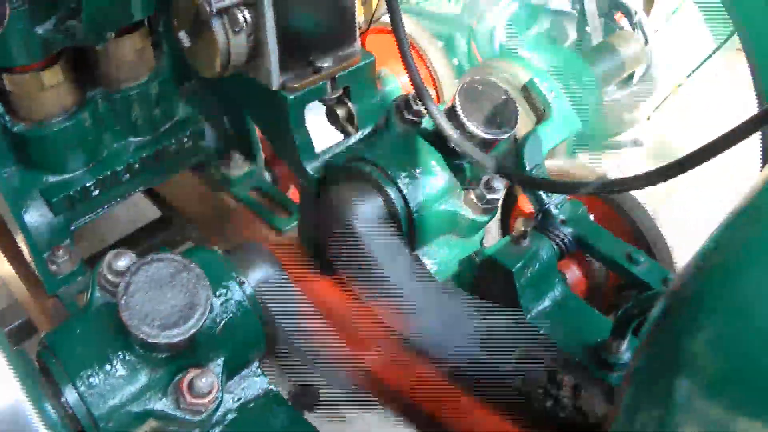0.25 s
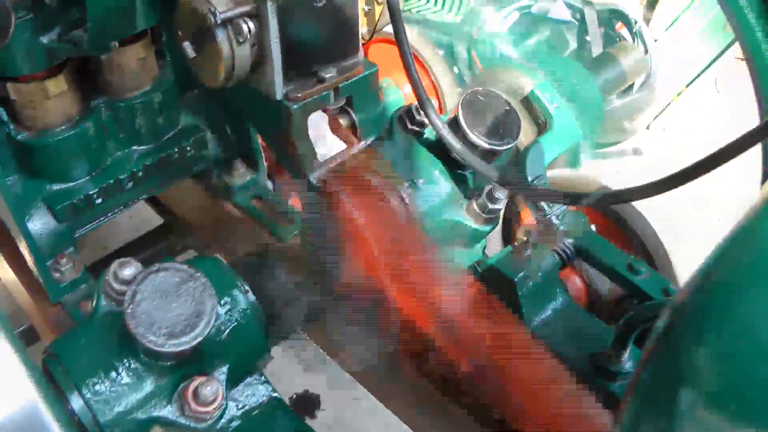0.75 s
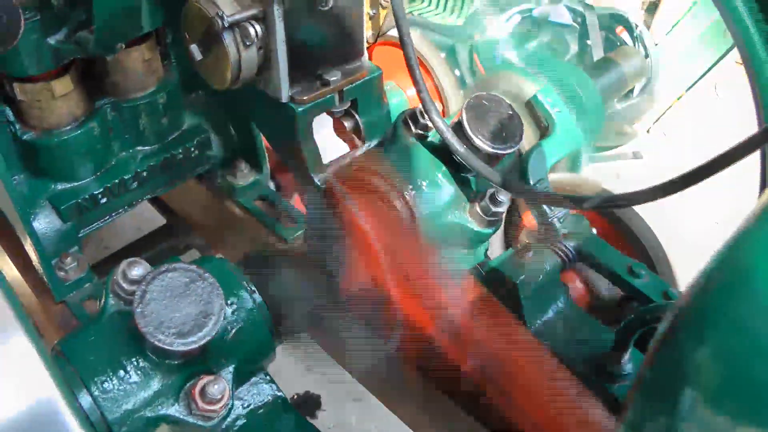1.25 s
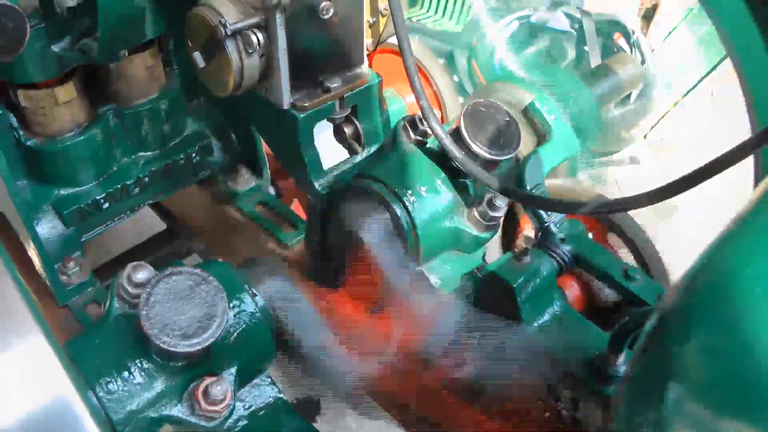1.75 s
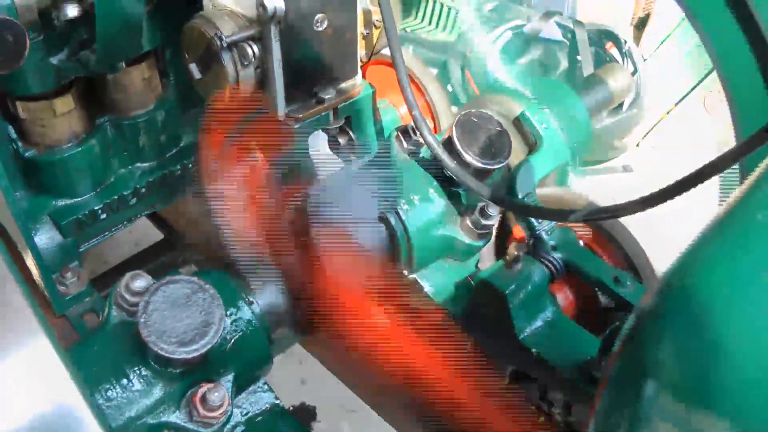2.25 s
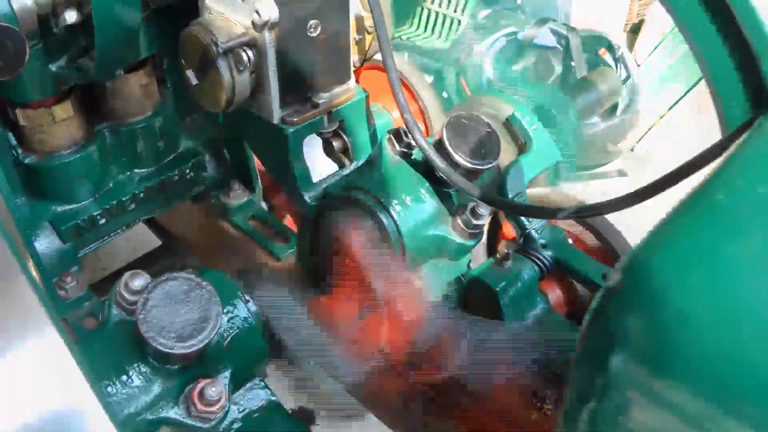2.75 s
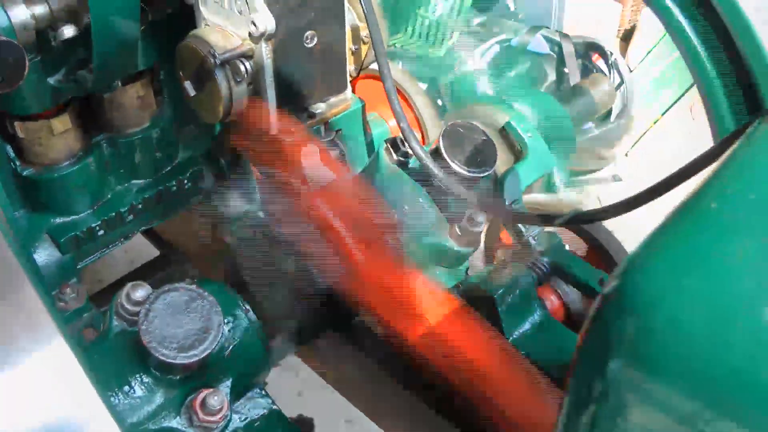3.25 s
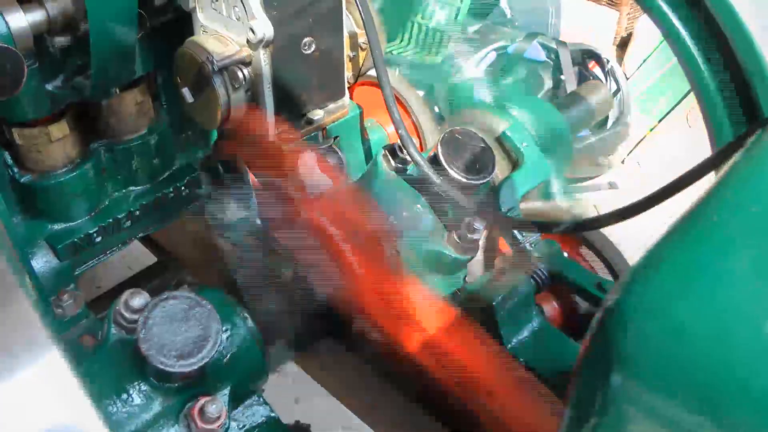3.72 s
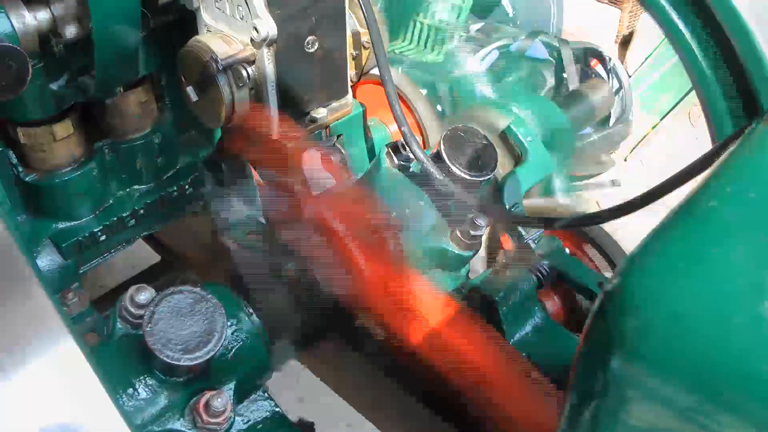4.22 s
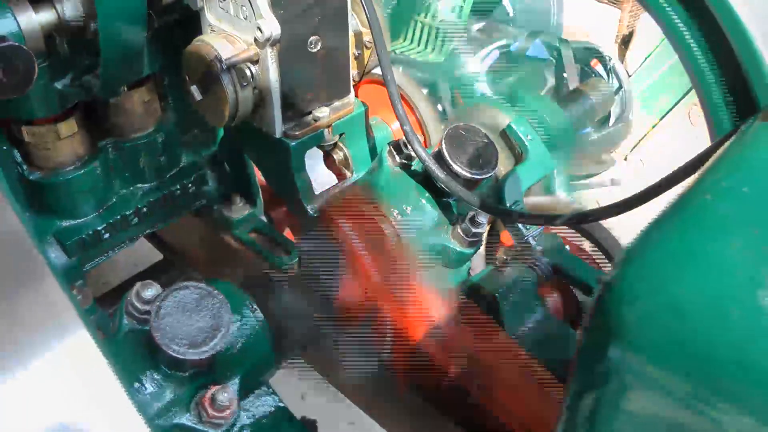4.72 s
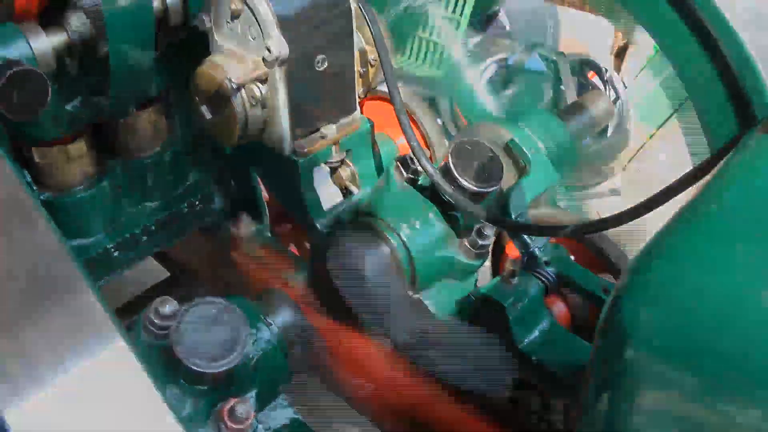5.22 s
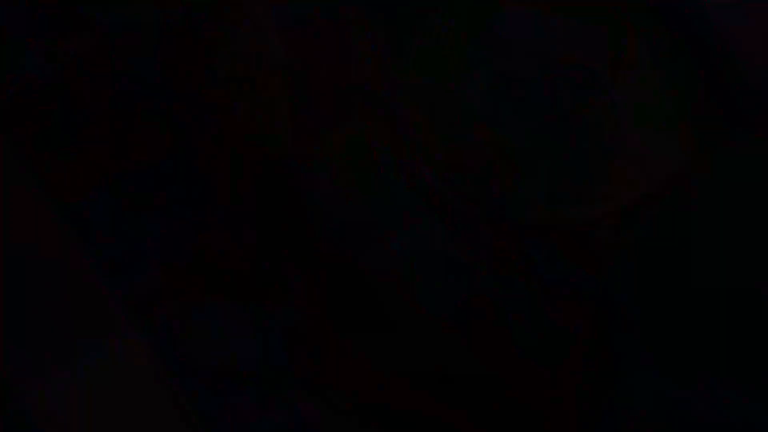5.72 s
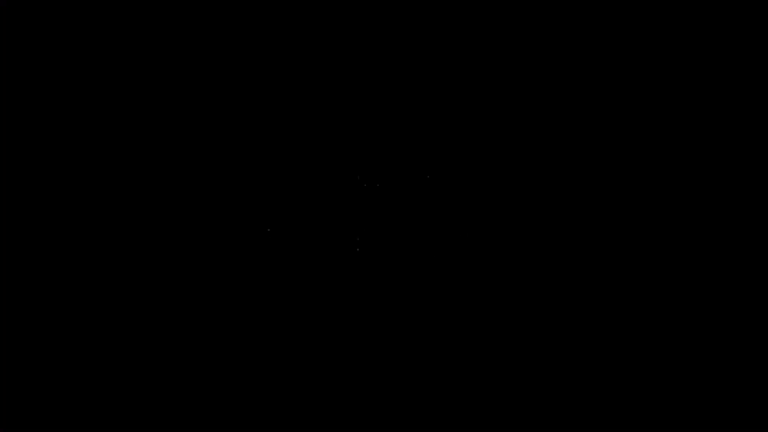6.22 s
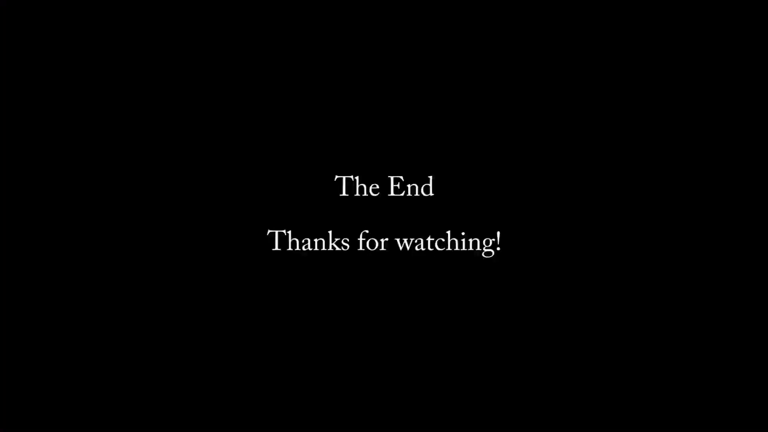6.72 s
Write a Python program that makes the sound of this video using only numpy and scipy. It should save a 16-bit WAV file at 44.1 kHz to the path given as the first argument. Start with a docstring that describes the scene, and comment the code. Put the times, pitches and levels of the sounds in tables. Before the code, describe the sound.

Close, quick iron knocking and rattling of an old engine with breathy hoots and metallic pings, two popping bangs, then sudden silence.

```python
"""Open-crank engine coasting and firing

Close to the crank of a single-cylinder engine that coasts and fires twice, in stereo, until the sound cuts off.
Rods, cam and valve gear knock as shaped noise and ring in the cast iron; two small steel parts ping as decaying
sines. Air hoots in the open valve port at every turn as a swelling sine with a rasp, over rattle and short echoes.
Each firing is a rush of coloured noise with a pop, a decaying swing of pressure."""
import sys
import numpy as np
from scipy import signal
from scipy.fft import rfft, irfft
from scipy.io import wavfile
from scipy.ndimage import uniform_filter1d

SR = 44100
rng = np.random.default_rng(int(sys.argv[2]) if len(sys.argv) > 2 else 0)


def amp(db):
    return 10 ** (np.asarray(db, float) / 20)


def write(x):
    x = np.atleast_2d(x).T
    wavfile.write(sys.argv[1], SR, np.round(np.clip(x, -1, 1) * 32767).astype(np.int16))


N = 307597  # length in samples


def evened(x):
    """Brings a signal to an rms of 1."""
    return x / np.sqrt(np.mean(x ** 2) + 1e-20)


def wander(noise, size):
    """Slow random drift of rms 1: noise averaged over size samples."""
    return evened(uniform_filter1d(noise, size=size))


def read(points, size):
    """A table in Hz read at the bins of a spectrum of size samples."""
    hz, value = np.transpose(points)
    return np.interp(np.log(np.fft.rfftfreq(size, 1 / SR) + 1), np.log(hz + 1), value)


def colour(x, points):
    """Filters a sound by a table of (Hz, dB)."""
    return irfft(rfft(x) * amp(read(points, x.shape[-1])), x.shape[-1])


def add(mix, s, sound):
    """Lays a sound into the mix at s seconds."""
    part = mix[max(round(s * SR), 0):][:len(sound)]
    part += sound[:len(part)]


def rings(modes, spread_db):
    """All modes of a part after one blow; where it lands sets their shares."""
    hz, db, t60 = np.transpose(modes)[:, :, None]
    t = np.arange(6000) / SR
    level_luck, pitch_luck = rng.standard_normal((2, len(modes), 1))
    decay = amp(db + spread_db * level_luck - 60 * t / t60)
    return (decay * np.sin(2 * np.pi * hz * (1 + 0.0061 * pitch_luck) * t)).sum(0)


# The crank, close by: one row per turn, and the cam needs two turns.
# Each row: rod knock in seconds, relative level of the knock in dB, level of the hoot in dB.
CRANK_TURNS = [(0.001, -7, -17.5), (0.1493, -1, -24), (0.3048, -4, -19), (0.4614, -1, -17.5),
               (0.6323, -4, -24.5), (0.783, -19, -20.5), (0.8911, -6, -19.5), (1.0266, -4.5, -12.5),
               (1.152, -3, -16), (1.28, -0.5, -15), (1.4087, -1.5, -13.5), (1.5365, 2, -16.5),
               (1.669, -5.5, -15.5), (1.8003, -1.5, -16.5), (1.9347, -5.5, -18), (2.0709, -1, -13.5),
               (2.2109, -2.5, -18), (2.3531, 0, -17.5), (2.4922, -4, -16), (2.6383, -2.5, -17.5),
               (2.7825, -8.5, -16.5), (2.9333, -6, -21), (3.0833, -3.5, -16.5), (3.2372, -3, -15.5),
               (3.3919, -2.5, -16.5), (3.5492, -1.5, -16), (3.7194, -5.5, -33), (3.869, -21, -24.5),
               (3.9889, -8.5, -21.5), (4.1155, -2.5, -15.5), (4.2389, -4, -16), (4.3676, 0, -16),
               (4.4965, -4.5, -16.5), (4.6257, -1.5, -14.5), (4.7568, -1.5, -15.5), (4.893, -0.5, -17.5),
               (5.028, -5, -17), (5.1624, 1, -17.5), (5.3052, -6, -14.5), (5.443, -1.5, -16.5),
               (5.5864, -4.5, -18), (5.7319, -2, -18), (5.878, -7.5, -18), (6.0268, -2, -19.5),
               (6.1783, -4.5, -16.5), (6.3348, -3, -18.5)]
WORKING_S = .34  # how long before a firing the valve shuts


def crank():
    """Start and length of every crank turn, and whether the valve is shut for a charge."""
    start = np.transpose(CRANK_TURNS)[0]
    length = np.diff(start, append=2 * start[-1] - start[-2])
    lead = np.array(FIRINGS)[:, None] - start
    working = ((lead > .05) & (lead < WORKING_S)).any(0)
    return start, length, working


def around_firings(rows):
    """A curve of (s from the firing, dB), played once for each firing, as a gain."""
    t = np.arange(N) / SR
    nearest = np.where(t < np.mean(FIRINGS), *FIRINGS)
    return amp(np.interp(t - nearest, *np.transpose(rows)))


def slack_db(s):
    """Load after a firing takes up the play, so loose parts fall quieter."""
    distance = np.min(abs(np.add.outer(-np.array(FIRINGS), s) - .1), 0)
    return np.interp(distance, [.06, .2], [-7, 0])


def echoes(x, t60):
    """Sparse reflections from the frame and the ground, different for each call."""
    at = np.arange(100, 8000, 22) + rng.integers(0, 22, 360)
    taps = np.zeros(8100)
    taps[at] = rng.choice([-1., 1.], len(at)) * amp(-60 * at / SR / t60)
    return signal.oaconvolve(x, taps / np.linalg.norm(taps))[:N]


# Gears and loose parts between the blows, thinner after each firing.
# Each row: seconds from the firing, level in dB.
RATTLE_LEVEL = [(-.05, -24), (.05, -33), (.2, -25.5), (.3, -22.5)]
# Colour of that whir. Each row: frequency in Hz, density in dB per Hz.
WHIR_COLOUR = [(15, -71.5), (25, -50), (289, -6.5), (368, -5.5), (457, -2.5), (1620, -5), (3530, -5.5),
               (5880, -13.5), (7500, -24.5), (8130, -23.5), (15500, -36.5)]


def rattle():
    """Dense small knocks and whir, partly ringing in the iron."""
    struck = rng.random(N) < 90 / SR  # 90 clicks a second on average
    clicks = amp(3.5 * np.minimum(rng.exponential(1, N), 2)) * struck
    u = np.arange(1500) / SR
    power = signal.oaconvolve(clicks ** 2, u * np.exp(-u / 0.0026))[:N]
    drive = evened(power.clip(0) ** .5) + 0.54  # the constant is the steady whir
    whir = evened(colour(drive * rng.standard_normal(N), WHIR_COLOUR))
    ring = evened(signal.oaconvolve(drive * rng.standard_normal(N), rings(IRON_MODES, 0))[:N])
    return around_firings(RATTLE_LEVEL) * (whir + 0.56 * ring)


# Gas hiss of intake and exhaust. Each row: seconds from the firing, level in dB.
RUSH_LEVEL = [(-.24, -57), (-.21, -24.5), (-.08, -39.5), (-.045, -15.5), (-.025, -16), (0, -27),
              (.015, -20), (.04, -33.5), (.12, -45.5)]
# Colour of the hiss. Each row: frequency in Hz, density in dB per Hz.
HISS_COLOUR = [(100, -26.5), (540, -5), (1500, -19.5), (2300, 1), (10500, -7.5), (15500, -15)]


def rush():
    """Gas hisses raggedly through the valves; the intake stroke also buffets low."""
    hiss, low, ragged = rng.standard_normal((3, N))
    hiss = amp(3.6 * wander(ragged, 120)) * evened(colour(hiss, HISS_COLOUR))
    low = evened(colour(low, [(30, -7.5), (120, 1), (250, -28.5)]))
    buffet = around_firings([(-.24, -72), (-.21, -34.5), (-.14, -31.5), (-.1, -69)])
    return around_firings(RUSH_LEVEL) * hiss + buffet * low


# Air rasping past the valve. Each row: frequency in Hz, density in dB per Hz.
RASP_COLOUR = [(200, -32.5), (500, -0.5), (900, 0.5), (1500, -6.5), (3000, -9.5), (8000, -40.5)]
# Rasp against the hoot in dB, for the first turn of the cam and for the second.
RASP_LEVEL_DB = [-2, -9]
PORT_HZ = 375.2  # pitch the port settles to
HOOT_AT, HOOT_LENGTH = .665, 0.22  # crest and length, as shares of the turn
SUCTION_LAG_S = .014  # later when drawing a charge
AFTER_AT, AFTER_DB = 0.35, -13  # the return flow hoots again, this share of a turn later and weaker


def hoots():
    """The port resonance swells and fades with the flow of each stroke; a rasp of air leads into it."""
    out, u = np.zeros(N), np.arange(-3500, 3500) / SR
    for k, ((_, _, db), start, turn, working) in enumerate(zip(CRANK_TURNS, *crank())):
        crest = start + HOOT_AT * turn + SUCTION_LAG_S * working
        length = HOOT_LENGTH * turn
        *flutter, air = rng.standard_normal((4, len(u)))
        pitch_flutter, level_flutter, rasp_flutter = evened(uniform_filter1d(flutter, size=250))
        sag = 1 + .15 * np.exp(-np.maximum(u + .02, 0) / 0.0052)  # starts sharp, settles
        cycles = np.cumsum(PORT_HZ * (sag + 0.02 * pitch_flutter)) / SR + rng.random()
        swell = np.exp(-abs(u / (length * np.where(u < 0, .5, .6))) ** 3.7)
        swell = swell + amp(AFTER_DB) * np.roll(swell, round(AFTER_AT * turn * SR))
        hoot = amp(2.8 * level_flutter) * swell * np.sin(2 * np.pi * cycles)
        rasp = amp(5.4 * rasp_flutter + RASP_LEVEL_DB[k % 2]) * np.exp(-((u + 0.013) / 0.019) ** 2)
        rasp = rasp * evened(colour(air, RASP_COLOUR))
        add(out, crest + u[0], amp(db) * (hoot + rasp))
    return out


TAP_SPREAD_DB, TAP_SCATTER_S = 5.5, 0.0059


def taps(pattern):
    """Light taps at nearly the same places of every turn, as (s, peak dB)."""
    start, length, _ = crank()
    share, db = np.transpose(pattern)[:, :, None]
    luck = rng.standard_normal((len(start), 2, len(pattern))).T
    s = start + share * length + TAP_SCATTER_S * luck[:, 0]
    level = db + slack_db(s) + TAP_SPREAD_DB * luck[:, 1]
    return list(zip(s.ravel(), level.ravel()))


def chatter(length_s, per_s):
    """A blow is a first contact and a few quick rebounds."""
    t = np.arange(2000) / SR
    hits = rng.standard_normal(len(t)) * (rng.random(len(t)) < per_s / SR) * np.exp(-t / length_s)
    hits[0] = 1
    return hits


def pings(events, modes, idle_db, shiver_per_s):
    """A small steel part rings at its blows and shivers faintly all the time."""
    out = np.zeros(N)
    for s, db in events:
        ring = signal.fftconvolve(chatter(.016, 260), rings(modes, 2.8))
        add(out, s, amp(db) * ring / abs(ring).max())
    shiver = rng.standard_normal(N) * (rng.random(N) < shiver_per_s / SR)
    return out + amp(idle_db) * evened(signal.oaconvolve(shiver, rings(modes, 0))[:N])


# Single blows of the small latch, most of them hard. Each row: start in seconds, peak level in dB.
LATCH_BLOWS = [(0.09, -16), (0.3233, -7), (0.4863, -15.5), (0.5674, -11.5), (0.6835, -12), (1.234, -14.5),
               (1.508, -17.5), (1.7484, -16), (2.7427, -15.5), (2.8735, -24), (3.104, -10), (3.4124, -12),
               (4.7157, -18.5), (4.9137, -17)]
# Its light taps, twice a turn. Each row: share of the turn, usual peak level in dB.
LATCH_LIGHT = [(.17, -20.5), (.68, -19)]
# How its steel rings. Each row: frequency in Hz, relative level in dB, t60 in seconds.
LATCH_RING = [(7412, 0, .07), (7465, -6, .05)]


def latch_pings():
    """The small latch, a pair of close high modes set ringing by single blows and light taps."""
    return pings(LATCH_BLOWS + taps(LATCH_LIGHT), LATCH_RING, -35.5, 130)


# Single blows of the loose lever, most of them hard. Each row: start in seconds, peak level in dB.
LEVER_BLOWS = [(0.3232, -9), (0.4938, -11), (0.9323, -13.5), (1.3044, -13), (1.4316, -21.5),
               (1.8262, -11.5), (2.2393, -7.5), (3.04, -7.5), (3.4131, -11.5), (4.9711, -21),
               (5.4685, -5.5), (5.546, -9), (5.7633, -8), (5.907, -9.5), (6.3659, -17)]
# Its light taps, twice a turn. Each row: share of the turn, usual peak level in dB.
LEVER_LIGHT = [(.2, -25), (.72, -21.5)]
# How its steel rings. Each row: frequency in Hz, relative level in dB, t60 in seconds.
LEVER_RING = [(3505, 0, .09), (3535, -10, .06), (11380, -28, .05)]


def lever_pings():
    """The loose lever, ringing mainly lower than the latch, struck in the same way."""
    return pings(LEVER_BLOWS + taps(LEVER_LIGHT), LEVER_RING, -30.5, 130)


# Bright tick in the second turn and on every slam. Each row: frequency in Hz, density in dB per Hz.
TICK_COLOUR = [(4000, -29.5), (8000, 4), (11000, 7), (15500, -4)]
TICK_AT, TICK_DB, SLAM_TICK_DB = .7, -20.5, -28  # share of the turn, relative levels in dB
TICK_S, SLAM_TICK_S = .003, .01  # the envelope crests at half of this


def ticks():
    """A short bright spit of hard steel on steel."""
    start, length, _ = crank()
    rows = [(s, TICK_DB + slack_db(s), TICK_S) for s in (start + TICK_AT * length)[1::2]]
    rows += [(s - .004, SLAM_TICK_DB, SLAM_TICK_S) for s, _ in PUSH_ROD_SLAMS]
    out, t = np.zeros(N), np.arange(2048) / SR
    for s, db, length_s in rows:
        noise = rng.standard_normal(len(t))
        level = amp(db + 3.7 * np.tanh(noise[0]))  # each tick lands differently
        envelope = t / length_s * np.exp(1 - t / length_s * 2)
        add(out, s, level * evened(colour(noise, TICK_COLOUR)) * envelope)
    return out


# Pressure pops, the two firings first.
# Each row: start in seconds, level in dB, pitch in Hz (negative for suction), t60 in seconds, left over right in dB.
PRESSURE_POPS = [(0.7927, 5, 480, 0.013, -4), (3.8797, 5, 480, 0.013, -4), (5.765, -13, -64, 0.034, 12)]
FIRINGS = [row[0] for row in PRESSURE_POPS[:2]]


def pops():
    """A pressure step that swings a few times; a negative pitch starts as suction."""
    out, t = np.zeros((2, N)), np.arange(4000) / SR
    for s, db, hz, t60, lean_db in PRESSURE_POPS:
        swing = amp(db - 60 * t / t60) * np.sin(2 * np.pi * hz * t)
        step = amp(db - 15.5) * np.sign(hz) * np.exp(-t / 0.0044)
        add(out[0], s, (swing + step) * amp(lean_db / 2))
        add(out[1], s, (swing + step) / amp(lean_db / 2))
    return out


# The push rod slams once per cam turn. Each row: start in seconds, relative level in dB.
PUSH_ROD_SLAMS = [(0.18, 3.5), (0.4938, -0.5), (0.7962, 2.5), (1.0488, 4.5), (1.3046, 4), (1.5579, 2),
                  (1.8297, 2.5), (2.0962, 1.5), (2.38, 1.5), (2.6626, 1.5), (2.9631, 3.5), (3.2684, 2.5),
                  (3.582, 0.5), (3.8844, 3.5), (4.143, 0.5), (4.3971, 3.5), (4.6565, 3), (4.9215, 1.5),
                  (5.1879, 2), (5.476, 1.5), (5.7538, 1), (6.053, 1.5), (6.3652, 1)]
# Lesser blows, one list for the first turn and one for the second.
# Each row: share of the turn, relative level in dB, thud in dB, spread in dB, scatter in seconds.
GEAR_BLOWS = [
    [(.175, -16.5, -12, 3.5, .003), (.48, -8, -8, 3, .004), (.75, -9.5, -12.5, -2.5, .004)],
    [(.535, -6.5, -11.5, -1, .0015), (.7, -7, -20, -4, .002)],
]
# Blows while the valve is shut for a cam turn; the gear plays otherwise.
# Each row: seconds from the firing, relative level in dB, thud in dB.
WORKING_BLOWS = [(-.246, -7, -5.5), (-.227, -5, -26), (-.208, 0, -16), (-.116, -5.5, -39), (-.045, -10, -5)]
ROD_THUD_DB, SLAM_THUD_DB = -11, -23.5  # weight of the dull thud in these blows
SLAM_SCUFF, SCUFF = .55, .04  # how much the parts scrape as they close


def blows():
    """Every blow as (s, dB, thud dB, scuff): rod knocks, slams, gear, and the pattern before a firing."""
    rows = [(s, db, ROD_THUD_DB, SCUFF) for s, db, _ in CRANK_TURNS]
    rows += [(s, db, SLAM_THUD_DB, SLAM_SCUFF) for s, db in PUSH_ROD_SLAMS]
    rows += [(fire + s, db, thud_db, SCUFF) for fire in FIRINGS for s, db, thud_db in WORKING_BLOWS]
    for k, (start, length, working) in enumerate(zip(*crank())):
        for share, db, thud_db, spread_db, scatter_s in GEAR_BLOWS[k % 2]:
            s = start + share * length
            luck = np.sqrt(3) * (2 * rng.random(2) - 1)  # uniform, rms 1
            if not working:
                level = db + spread_db * luck[1] + slack_db(s)
                rows.append((s + scatter_s * luck[0], level, thud_db, SCUFF))
    return rows


# Ringing of the cast iron. Each row: frequency in Hz, relative level in dB, t60 in seconds.
IRON_MODES = [(1124, -5, 0.22), (1354, 2.5, 0.1), (1977, 8.5, 0.062), (2263, -4, 0.61), (2715, 1, 0.15),
              (3280, -12, 0.12), (4774, 12.5, 0.017), (5068, 13, 0.013), (6100, 0, 0.026), (8040, -17, .02),
              (11400, -11, .03)]
# Colour of a blow above the thud. Each row: frequency in Hz, density in dB per Hz.
CRACK_COLOUR = [(760, -43.5), (1300, -18), (2230, 1.5), (2980, -4), (3450, -3.5), (6900, -13),
                (7500, -21.5), (7980, -15), (15500, -54.5)]
# Colour of the dull thud. Each row: frequency in Hz, density in dB per Hz.
THUD_COLOUR = [(24, -62.5), (40, -70.5), (279, -9.5), (372, -1.5), (446, 0), (830, 4), (1500, -5.5),
               (1950, -62.5), (3300, -120)]
DULL_DB = -0.14  # treble tilt per octave for each dB of extra thud


def knocks():
    """Each blow: a crack of its own colour, the iron ringing, and a dull thud; heavy blows grind on longer."""
    out, t = np.zeros(N), np.arange(4096) / SR
    for s, db, thud_db, scuff in blows():
        crack, low, patch, jitter = rng.standard_normal((4, len(t)))
        hold = (0.01 + 0.011 * scuff) * amp(0.15 * db)
        after = np.maximum(t - .012, 0)  # contact closes 12 ms in
        grip = (1 - np.exp(-after / 0.00085)) * np.exp(-(after / hold) ** 1.18)
        grip = grip + scuff * np.exp(-((t - .011) / 0.009) ** 2)  # parts scuff as they close
        grip = grip * amp(3.4 * wander(jitter, 40))  # the contact stutters
        place_db = 3.6 * wander(patch, 60)[:len(t) // 2 + 1]  # uneven colour, new for each blow
        place_db = place_db + (thud_db + 19) * read([(1500, 0.00079), (6000, 2 * DULL_DB)], len(t))
        ring = signal.fftconvolve(grip * jitter, rings(IRON_MODES, 2.5))[:len(t)]
        blow = evened(evened(colour(crack, CRACK_COLOUR)) * grip) + 0.71 * evened(ring)
        blow = evened(irfft(rfft(np.roll(blow, 64)) * amp(place_db)))
        thud = evened(colour(low, THUD_COLOUR)) * (1 - np.exp(-t / 0.00059)) * np.exp(-t / 0.023)
        # the frame gives way
        push = .5 * np.sign(low[0]) * np.sin(2 * np.pi * 190 * t) * np.exp(-t / .004)
        add(out, s - .015, amp(db - 20.5) * blow)
        add(out, s - .001, amp(db + thud_db - 2.5) * (thud + push))
    return out


# Sound arriving by scattered paths. Each row: frequency in Hz, side against middle in dB.
SCATTERED_SIDE = [(60, -20.5), (180, -15), (550, -14), (1650, -13), (4970, -16.5), (15000, -48)]
# Lean of the machine in the stereo field. Each row: frequency in Hz, left over right in dB.
MACHINE_LEAN = [(60, -3), (380, -2.5), (2380, -2.5), (15000, 1.5)]


def stereo(mid, left_first):
    """Spreads the sound by paths of unlike delay and a lean; left_first has its phase ahead on the left."""
    spectrum = rfft(mid)
    delay = 0.019 + 0.002 * wander(rng.standard_normal(len(spectrum)), 300)  # seconds, per frequency
    side = spectrum * amp(read(SCATTERED_SIDE, N)) * np.exp(-2j * np.pi * np.cumsum(delay) * SR / N)
    # the parts sit a little right, save in the top treble
    side = side + spectrum * np.tanh(read(MACHINE_LEAN, N) * np.log(10) / 40)
    side = irfft(side + .4j * rfft(left_first), N)
    return np.array([mid + side, mid - side])


def scene():
    """The whole engine with its short echoes, in stereo."""
    air, latch = hoots(), latch_pings()
    near = rattle() + rush() + air + latch + lever_pings() + ticks() + knocks()
    mid = near + amp(-16.0) * echoes(near, 0.31)
    # hoot and latch reach the left side first
    return stereo(mid, air + 0.37 * latch) + pops()


def roll_off(x):
    """The treble ends steeply here."""
    return signal.sosfilt(signal.butter(12, 15710, fs=SR, output="sos"), x)


CUT_S = 6.3885  # the abrupt cut, in seconds


def record(dry):
    """Soft overload at full scale, weak deep bass, a small dip in the treble near 14 kHz, and the abrupt cut."""
    held = np.clip(1.24 * np.tanh(dry / 1.2), -1, 1)
    held = colour(held, [(20, -19.0), (80, -5.5), (12500, 2), (14200, -4.5), (15200, 3.0)])
    mix = held * (np.arange(N) < CUT_S * SR)
    return roll_off(mix)


dry = scene()
out = record(dry)
write(out)
```